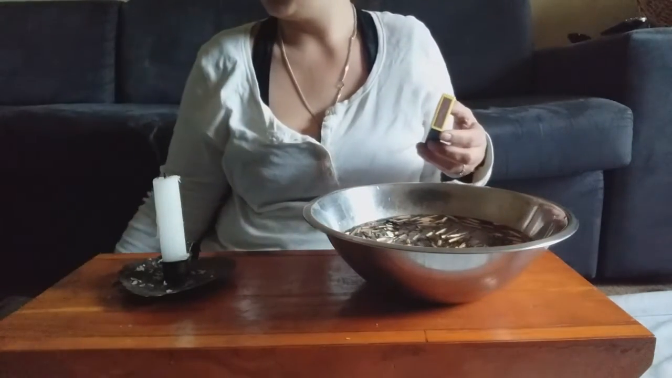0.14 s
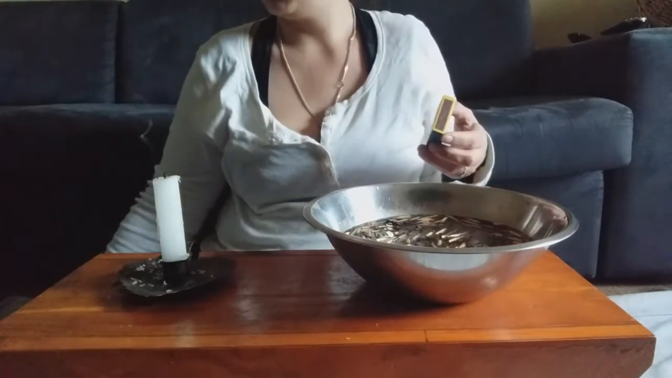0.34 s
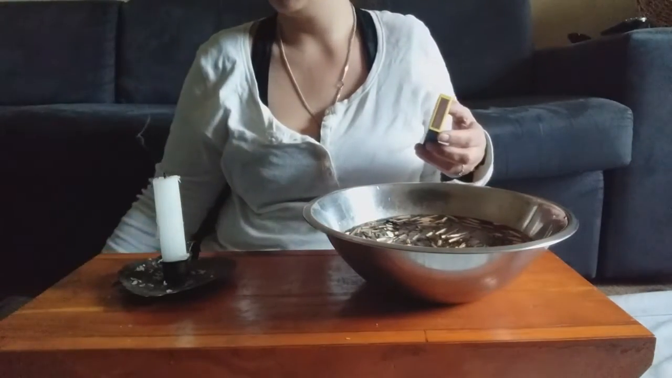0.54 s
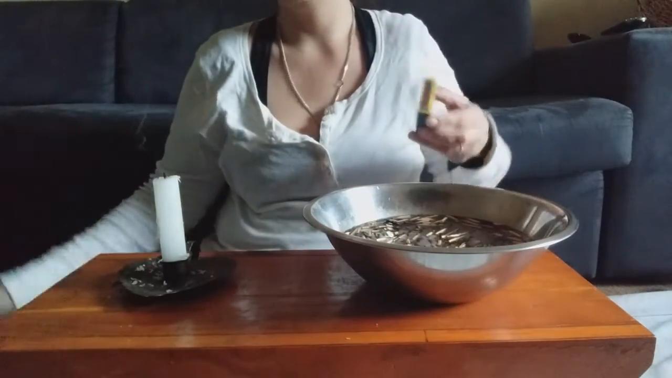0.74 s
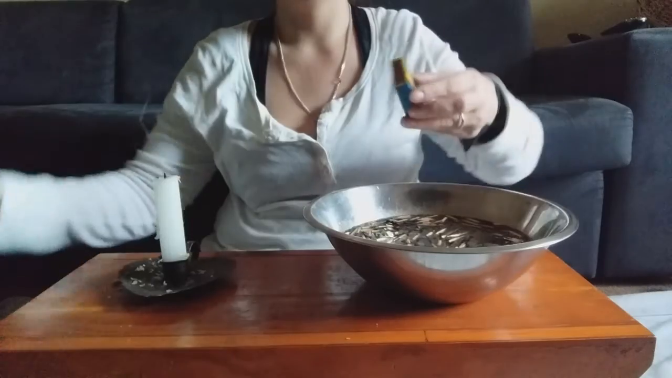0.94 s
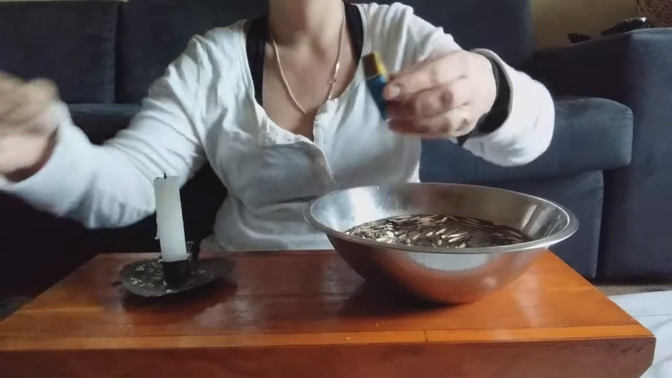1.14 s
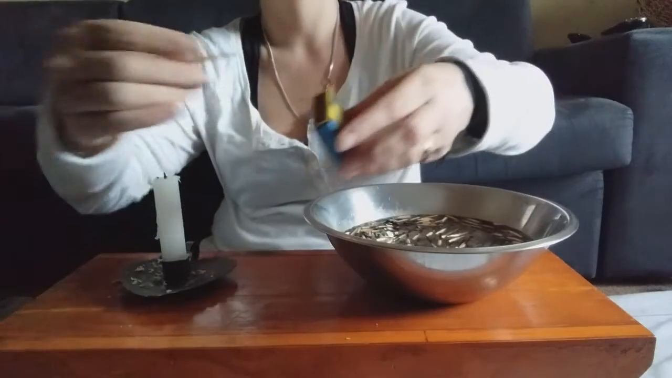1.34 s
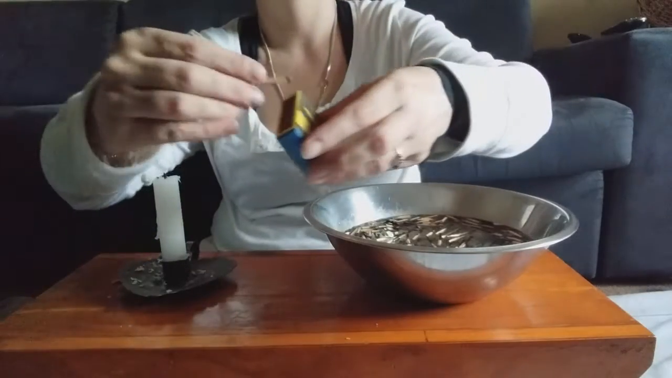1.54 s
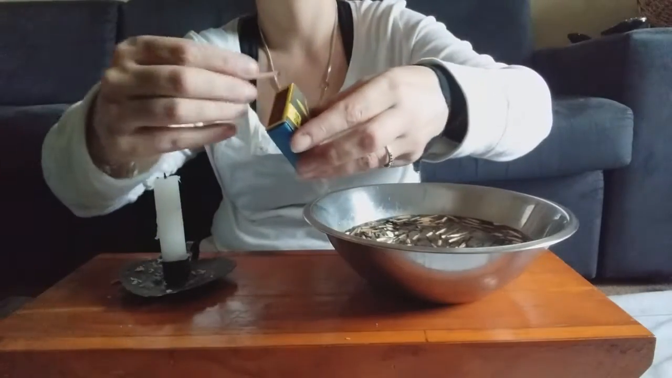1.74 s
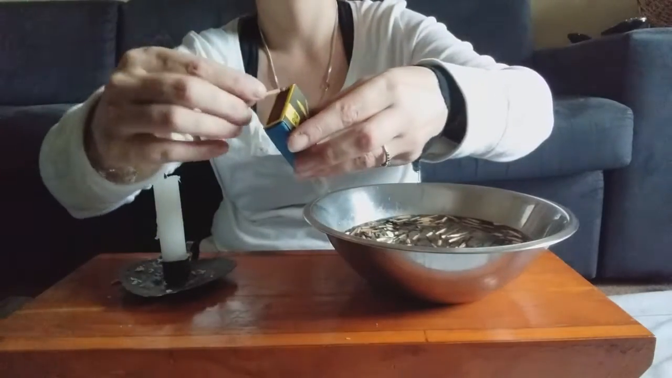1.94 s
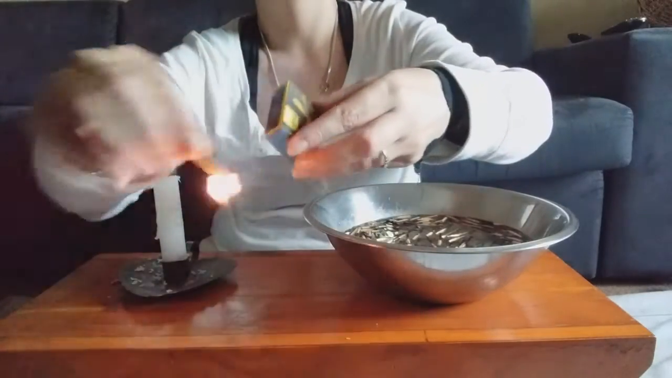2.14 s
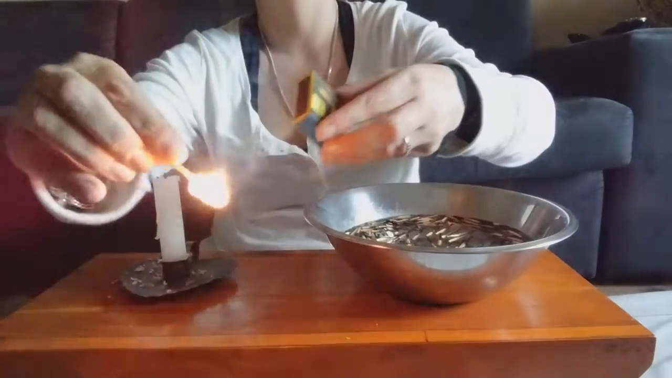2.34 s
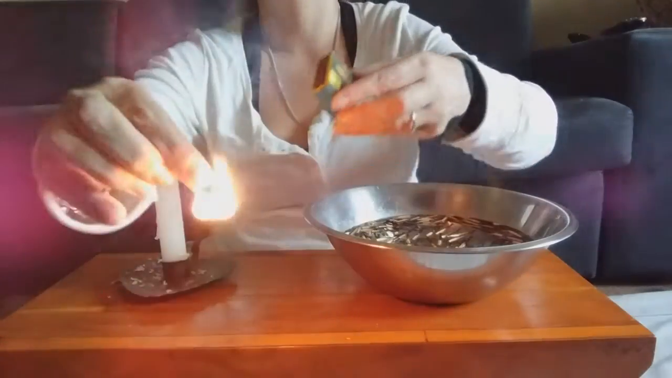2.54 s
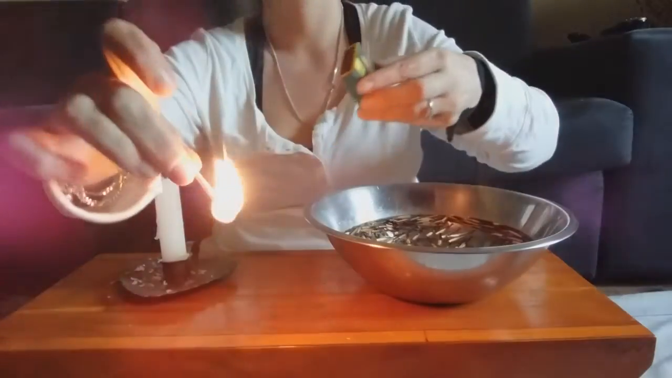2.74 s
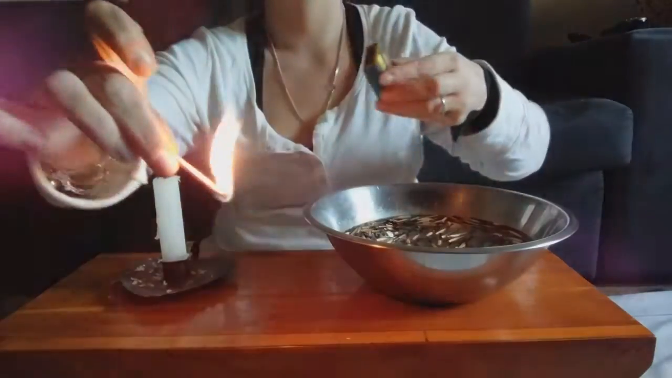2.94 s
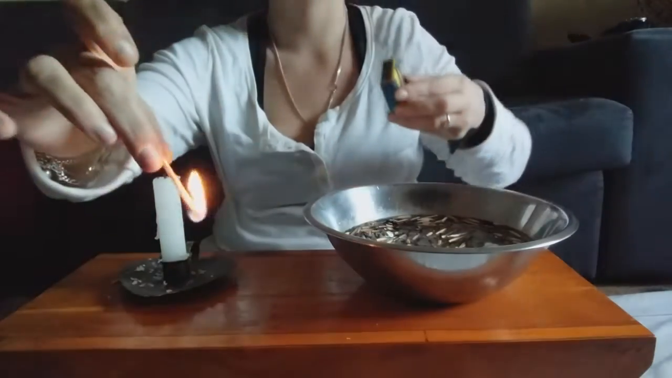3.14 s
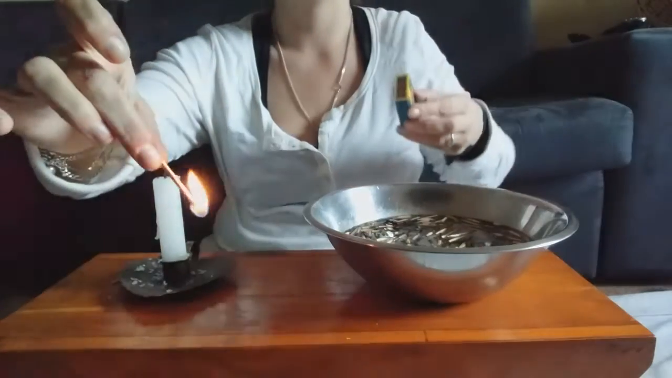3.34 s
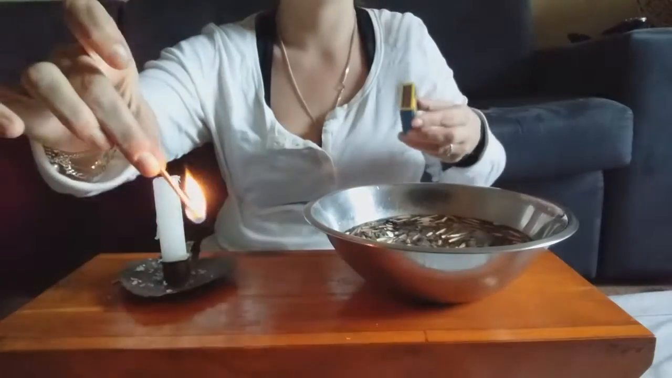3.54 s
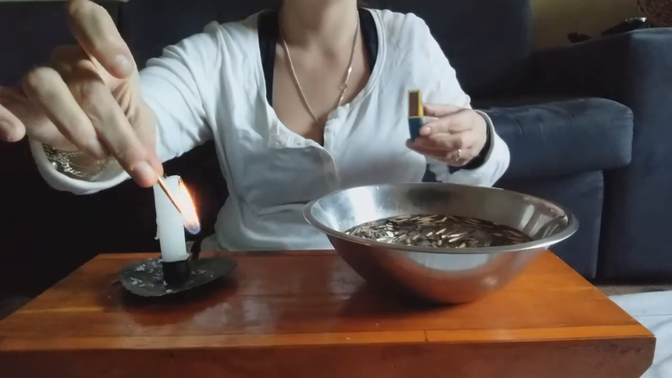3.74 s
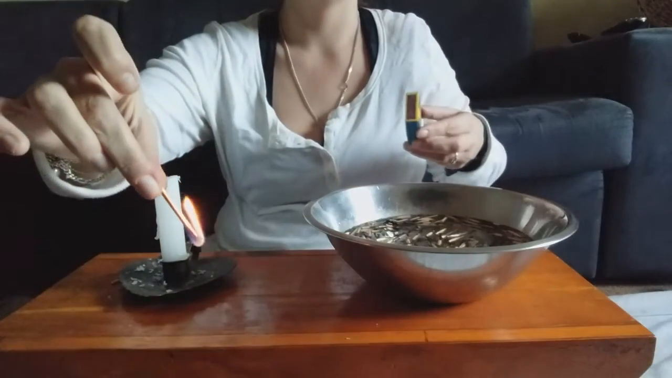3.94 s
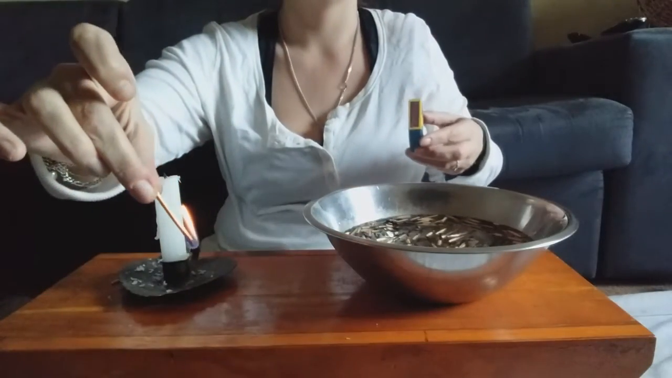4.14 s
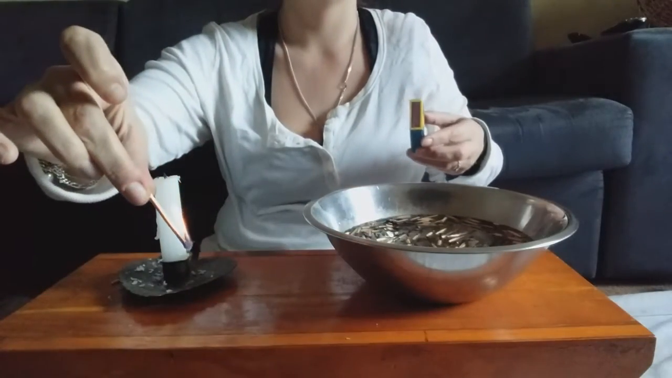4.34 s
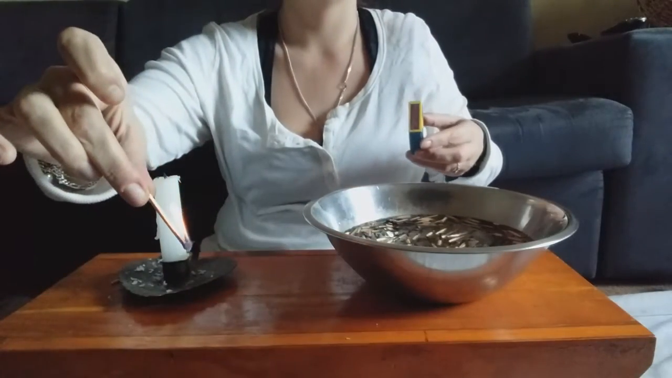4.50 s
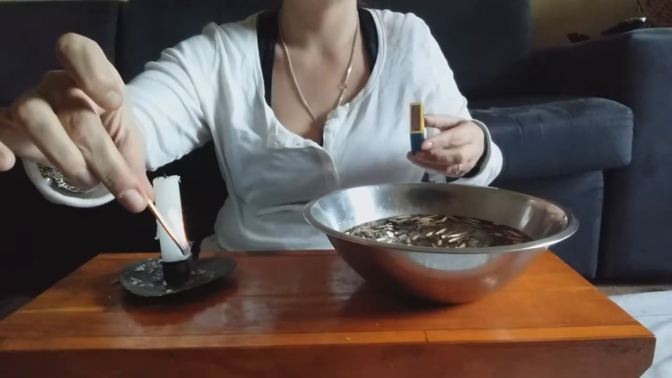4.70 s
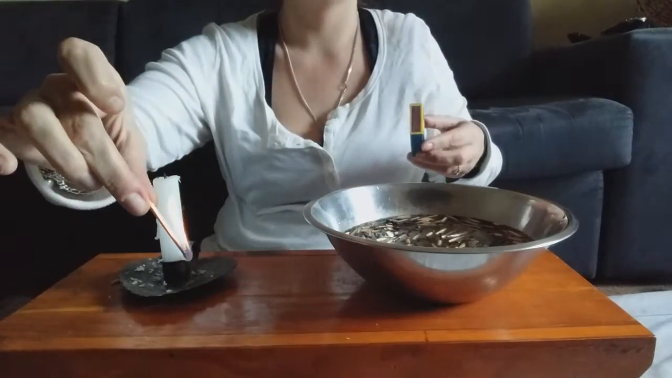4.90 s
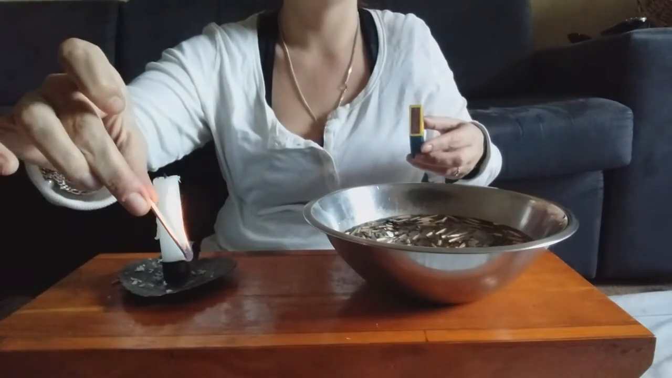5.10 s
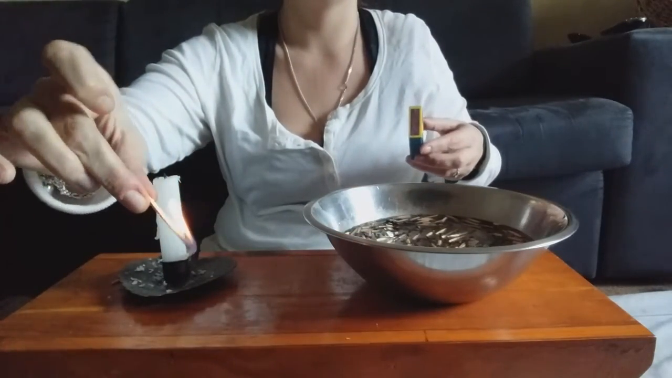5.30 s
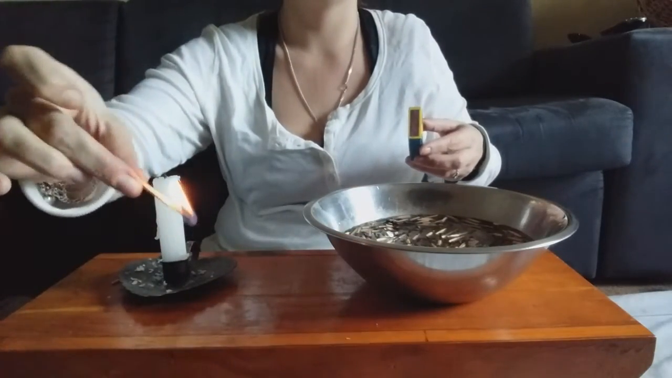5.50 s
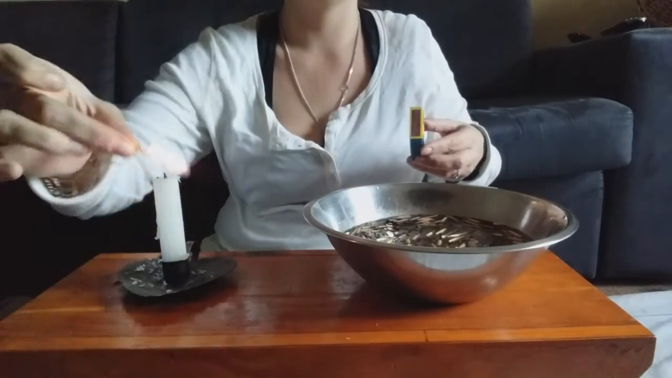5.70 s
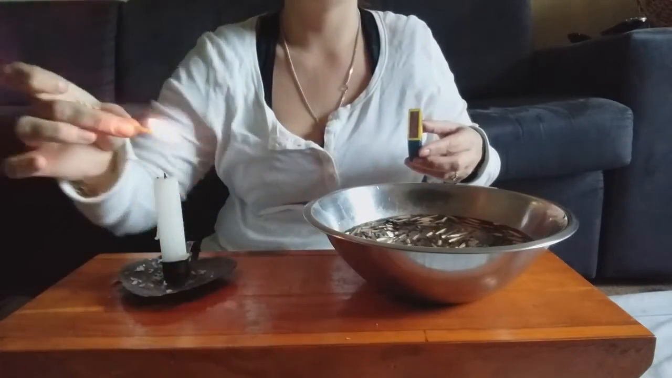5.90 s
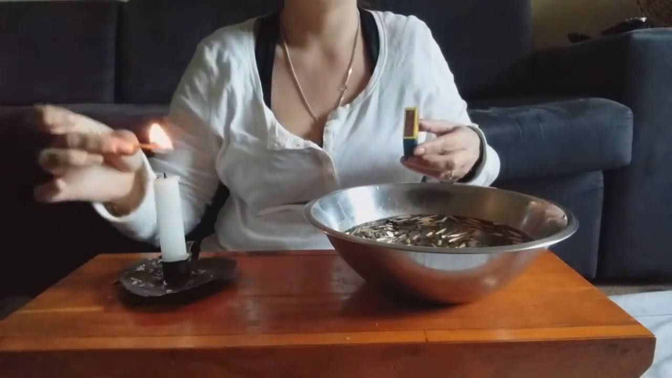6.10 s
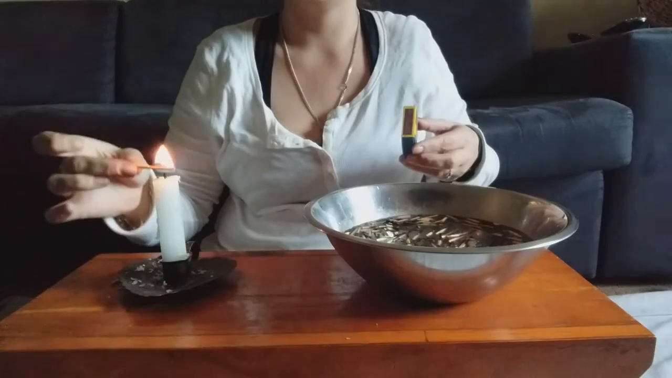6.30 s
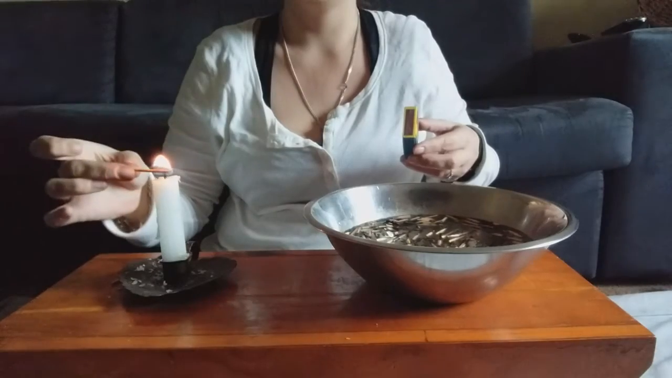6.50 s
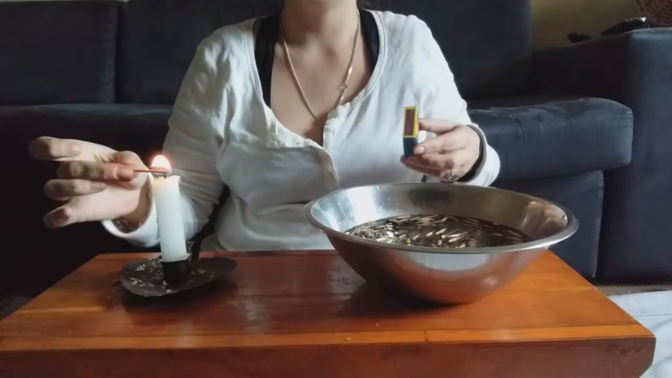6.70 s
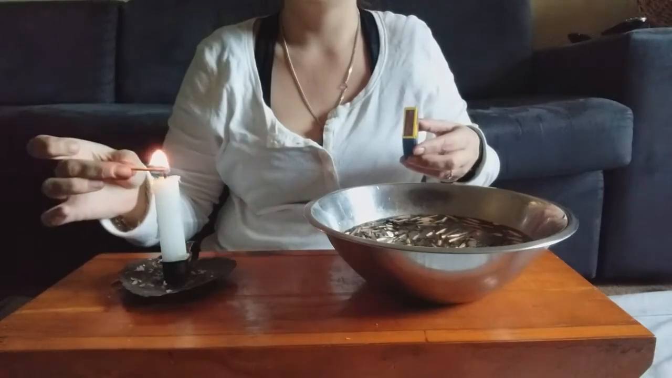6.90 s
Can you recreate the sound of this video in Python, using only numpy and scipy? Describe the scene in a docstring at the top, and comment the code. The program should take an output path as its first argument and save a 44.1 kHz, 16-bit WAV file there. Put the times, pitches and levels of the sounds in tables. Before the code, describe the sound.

A matchstick knocks lightly on its small box, then rasps briefly along the strip and ignites with a breathy, bright hiss. Scattered sharp pops follow as the hiss fades. After a quieter spell, the flame meets waxy wick material and crackles violently, with snapping bursts and short sputters, before dwindling to tiny ticks. The microphone is near, in a furnished room with short reflections, faint hiss, dim motor hum and soft rumble.

```python
"""A low rumble, a faint motor hum and microphone hiss (shaped noise and sines) run throughout.
First come faint high tinkles (narrow noise). From 1.7 s a match taps its cardboard box: short pushes make it ring.
At 2.2 s the match is dragged along the strip (bursts of rubbing noise) and flares with a hiss over a low roar.
From 2.5 s the flame spits sharp pops (short wave packets), thickest near 5 s, when it meets a waxy wick.
Puffs of gritty hiss join them from 3.5 s. A furnished room answers all but the steady background."""
import sys
import numpy as np
from scipy import signal
from scipy.fft import rfft, irfft, next_fast_len
from scipy.io import wavfile
from scipy.ndimage import uniform_filter1d

SR = 44100
rng = np.random.default_rng(int(sys.argv[2]) if len(sys.argv) > 2 else 0)


def generate_wav(sig):
    """Save sig (samples, or channels by samples) to the path in sys.argv[1] as 16-bit PCM at SR."""
    pcm = np.round(np.clip(np.atleast_2d(sig).T, -1, 1) * 32767).astype(np.int16)
    wavfile.write(sys.argv[1], SR, pcm)


N = 310974  # samples in the scene


def undb(db):
    """Turn decibels into a plain multiplier."""
    return 10 ** (np.asarray(db) / 20)


def unit(x):
    """Scale to rms 1."""
    return x / np.sqrt(np.mean(x ** 2))


def lowpass(x, hz):
    """Keep what lies below hz, with a gentle two-pole slope."""
    return signal.lfilter(*signal.butter(2, hz, fs=SR), x)


def highpass(x, hz):
    """Keep what lies above hz, with a gentle two-pole slope."""
    return signal.lfilter(*signal.butter(2, hz, "high", fs=SR), x)


def band(x, hz, width_hz):
    """Two-pole resonance, gain 1 at the centre."""
    centre_hz = min(hz, .45 * SR)
    return signal.lfilter(*signal.iirpeak(centre_hz, hz / width_hz, fs=SR), x)


def modes(x, table):
    """A body with several resonances of alternating sign."""
    out = 0
    for k, (hz, width_hz, db) in enumerate(table):
        out = out + (-1) ** k * undb(db) * band(x, hz, width_hz)
    return out


def colour(x, table):
    """Shape the spectrum of a steady noise by points of frequency and level; rms 1."""
    hz, db = np.transpose(table)
    size = next_fast_len(N)
    f = np.arange(size // 2 + 1) * SR / size + 1  # + 1 avoids log(0)
    gain = undb(np.interp(np.log(f), np.log(hz), db, -90, -90))
    return unit(irfft(rfft(x, size) * gain, size)[:N])


def curve(table):
    """Join the rows of a table by straight lines over time; very low outside."""
    s, *columns = np.transpose(table)
    t = np.arange(N) / SR
    return [np.interp(t, s, column, -120, -120) for column in columns]


def walk(rate):
    """Slow random sway: levels held for 1 / rate s, then smoothed twice; rms 1."""
    k = int(SR / rate)
    steps = np.repeat(rng.standard_normal(N // k + 1), k)
    smooth = uniform_filter1d(uniform_filter1d(steps, k), k)
    return unit(smooth[:N])


def grit(rate, spread_db):
    """Random clicks, rate per second on average, a few far larger than the rest; rms 1."""
    hit = rng.random(N) < rate / SR
    size = undb(spread_db * rng.exponential(size=N))
    return unit(hit * rng.standard_normal(N) * size)


def bursts(s, db, length, edge=2):
    """Envelope of bursts that rise quickly, then fade; a higher edge stops them more abruptly."""
    env = np.zeros(N)
    for start, gain, d in zip(s, undb(db), length):
        u = np.arange(int(4 * d * SR)) / (d * SR)  # time in burst lengths
        i = int(start * SR)
        env[i:i + len(u)] += gain * np.minimum(8 * u, 1) * np.exp(-u ** edge * 1.2)
    return env


# low rumble of the house: (t/s, level/dB)
RUMBLE_LEVEL = [(0.0, -64), (0.96, -64.5), (1.3, -67.5), (2, -66), (2.8, -65.5), (3.3, -66.5), (4.3, -69),
                (5.6, -70.5), (7.06, -69.5)]
# its spectrum: (f/Hz, relative level/dB)
RUMBLE_TONE = [(15, -60.5), (25, -30), (40, -5), (81, 0), (123, -3.5), (167, -17.5), (358, -27),
               (442, -27.5), (467, -27.5), (700, -35.5), (910, -66.5), (1540, -120)]


def rumble():
    """Low-pitched noise whose level sways."""
    sway_db = 1.7 * walk(9.9)
    return colour(rng.standard_normal(N), RUMBLE_TONE) * undb(curve(RUMBLE_LEVEL)[0] + sway_db)


HUM_HZ, HUM_WAVER_HZ = 48.45, .15  # base frequency and its rms waver
# overtones of the motor hum: (multiple of the base frequency, rms level/dB)
HUM_LINES = [(7, -94.5), (8, -94), (9, -91), (11, -99)]


def motor_hum():
    """A few sine overtones that waver together in pitch."""
    turns = np.cumsum(HUM_HZ + HUM_WAVER_HZ * walk(3)) / SR
    out = 0
    for multiple, db in HUM_LINES:
        phase = 2 * np.pi * (multiple * turns + rng.random())
        out = out + np.sqrt(2) * undb(db) * np.sin(phase)
    return out


HISS_DB = -79.5  # rms
# spectrum of the microphone hiss: (f/Hz, relative level/dB)
HISS_TONE = [(410, -32), (700, -4.5), (1060, -3), (1120, -5), (2770, -5), (8650, -8), (15200, -6),
             (16000, -8.5)]


def microphone_hiss():
    """Steady noise from the microphone itself."""
    return undb(HISS_DB) * colour(rng.standard_normal(N), HISS_TONE)


TINKLE_SWAYS_PER_S = 70
# faint high tinkles: (t/s, f/Hz, level/dB before the last filter, length/s)
TINKLES = [(.322, 9650, -79.5, 0.08), (0.33, 6580, -84, 0.068), (0.415, 6500, -78, 0.032),
           (0.424, 5400, -86, .02), (0.468, 5260, -86, .03), (0.587, 9800, -77.5, .015)]


def tinkles():
    """Narrow bands of noise, high up, rattle briefly."""
    out = 0
    for s, hz, db, length in TINKLES:
        noise = unit(band(rng.standard_normal(N), hz, 400))
        rattle = noise * undb(4 * walk(TINKLE_SWAYS_PER_S))
        out = out + band(rattle * bursts([s], [db], [length], 4.3), hz, 600)
    return out


# hot gas spits out in short puffs: (t/s, level/dB, length/s, low flutter level/dB over the hiss)
PUFFS = [(3.543, -83, 0.021, 5), (3.576, -76, 0.068, -10), (3.835, -77.5, 0.036, -8),
         (3.873, -78, 0.035, -18), (4.507, -58, 0.018, -10), (4.527, -61.5, 0.015, 4.5),
         (4.858, -53, 0.019, -37), (4.957, -62, 0.013, -11), (4.988, -47.5, 0.0096, -3),
         (5.004, -58.5, 0.023, 3.5), (5.032, -65, 0.051, -0.5), (5.04, -54, 0.0196, -19),
         (5.183, -59, 0.012, -7), (5.205, -40, 0.017, -10), (5.211, -56.5, 0.062, -14.5),
         (5.25, -68, 0.021, -9), (5.399, -67.5, 0.046, -8), (5.45, -77, 0.027, -4), (5.497, -73, 0.02, -4),
         (5.583, -71, 0.05, -20), (5.997, -77, .04, -13)]
# resonances of the flutter: (f/Hz, width/Hz, level/dB)
FLUTTER = [(190, 71, 3), (415, 250, 6), (1268, 540, 4)]
# spectrum of the hiss: (f/Hz, relative level/dB)
PUFF_TONE = [(1000, -3), (2000, -5.5), (3200, 2), (5500, 4), (8000, 0), (12000, -1), (16000, -4)]


def puffs():
    """Spurting gas makes a gritty hiss with a low flutter."""
    s, db, length, low_db = np.transpose(PUFFS)
    hiss = colour(grit(7000, 1.6), PUFF_TONE) * bursts(s, db, length)
    flutter = unit(modes(rng.standard_normal(N), FLUTTER)) * bursts(s, db + low_db, length)
    return hiss + flutter


CRACKLE_SPREAD_DB = 4  # most that a pop strays from the mean level
CRACKLE_TREBLE_DB, CRACKLE_TREBLE_SPREAD_DB = -3, 5  # snap over crack: mean, most it strays
# stretches of small random pops: (start t/s, length/s, pops per s, mean level/dB)
CRACKLE = [(2.926, .11, 94, -48), (4.846, .016, 200, -46), (4.916, 0.077, 97, -44), (5.003, .06, 83, -44),
           (5.105, .016, 180, -51), (5.185, .08, 67, -40)]


def crackle():
    """Rows of small pops, loosely spread over each crackling stretch."""
    rows = []
    for start, length, rate, db in CRACKLE:
        count = max(round(length * rate), 1)
        chance = rng.random((32, 3))[:count].T
        n = chance.shape[1]
        s = start + length * (np.arange(n) + chance[0]) / n
        size_db = db + CRACKLE_SPREAD_DB * (2 * chance[1] - 1)
        treble_db = CRACKLE_TREBLE_DB + CRACKLE_TREBLE_SPREAD_DB * (2 * chance[2] - 1)
        rows += zip(s, size_db, treble_db)
    return rows


def wavelet(hz, cycles, phase):
    """A short bell-shaped wave packet, one row per pop; cycles sets its half-width."""
    u = (np.arange(-100, 101) / SR) * np.reshape(hz, (-1, 1))
    return np.exp(-(u / cycles) ** 2) * np.cos(2 * np.pi * u + np.reshape(phase, (-1, 1)))


CRACK_HZ, CRACK_HZ_PER_DB, CRACK_CYCLES = 5350, 82, 0.49  # Hz rise per dB of treble
SNAP_HZ, SNAP_CYCLES = 12300, 0.71
THUMP_HZ, THUMP_CYCLES = 556, 0.36
THUMP_DB, THUMP_GROWTH = -65, 0.63  # thump of a -40 dB pop; dB gained per dB of pop
# the clear pops of the flame: (t/s, crack level/dB before the bass cut, snap level/dB over it)
POPS = [(2.451, -34, -12), (2.5219, -29, -1), (2.8864, -38.5, 3), (2.9121, -32, 2.5), (2.959, -36, 0),
        (3.0193, -44, 10), (3.2466, -53.5, -6), (3.5473, -49, 1), (3.5723, -48, -1), (3.8325, -50, -3.5),
        (3.8739, -52.5, 0), (4.3047, -54.5, 5.5), (4.4634, -59, -2), (4.5057, -31, -5.5),
        (4.5136, -34.5, -3), (4.515, -41, -6), (4.5295, -26, -2.5), (4.5872, -47, -18), (4.597, -45, -2),
        (4.6307, -51, -17), (4.6487, -50.5, -14), (4.692, -40.5, -5.5), (4.716, -47.5, 1),
        (4.7425, -52.5, -1), (4.7776, -43.5, -2.5), (4.8645, -27.5, -1), (4.8699, -29, 3.5),
        (4.9074, -48, -13), (4.9407, -37.5, 2), (4.9537, -39, 1), (4.963, -36, 0), (4.9716, -25.5, -2),
        (4.9902, -12.5, -4), (5.0088, -35, 2), (5.0145, -31, -2), (5.0171, -32.5, 5.5), (5.0463, -29, -6),
        (5.048, -32, 1), (5.0623, -24.5, 5), (5.1126, -27, 5), (5.1274, -38.5, 3), (5.1824, -27, -0.5),
        (5.187, -30, 1), (5.2032, -20.5, -5.5), (5.2089, -22.5, -1), (5.2095, -24.5, 5),
        (5.2129, -14.5, -3), (5.2152, -13, -1), (5.2231, -32, -13), (5.2427, -27.5, -1),
        (5.273, -35.5, 0.5), (5.3203, -50, 2), (5.3964, -35, 2.5), (5.4003, -43, -2), (5.4238, -48, 2),
        (5.4544, -38.5, -1), (5.4983, -42.5, -1), (5.506, -51, -3), (5.5829, -37.5, 2.5), (5.591, -54, 8),
        (5.726, -60.5, 6), (5.8719, -61, -4), (5.8785, -57, -4), (5.891, -63.5, 8), (5.9972, -52.5, -9),
        (6.014, -58, -11), (6.232, -59.5, -23)]


def pops():
    """Each burst pocket of gas gives a short crack, a brighter snap and a late thump."""
    s, db, treble_db = np.transpose(POPS + crackle())
    chance = rng.standard_normal((len(s), 5)).T
    at = (s * SR).astype(int)[:, None] + np.arange(-100, 101)
    # pops with more treble also crack higher
    hz = CRACK_HZ + CRACK_HZ_PER_DB * np.clip(treble_db, -25, 10)
    hz = hz * (1 + .12 * np.tanh(chance[4]))
    crack = wavelet(hz, CRACK_CYCLES, 3.3 + .5 * chance[0])
    snap = wavelet(SNAP_HZ * (1 + chance[1] / 14), SNAP_CYCLES, np.pi * chance[2])
    thump_hz = THUMP_HZ * (1 + np.tanh(chance[3]) / 6)
    thump = wavelet(thump_hz, THUMP_CYCLES, np.full(len(s), np.pi / 2))
    out = np.zeros(N)
    np.add.at(out, at, undb(db)[:, None] * (crack + undb(treble_db)[:, None] * snap))
    # a tiny source radiates no bass of its own
    out = highpass(out, 1100)
    thump_db = THUMP_DB + THUMP_GROWTH * (db + 40)
    np.add.at(out, at + 30, undb(thump_db)[:, None] * thump)  # 30 samples late
    return out


# resonances of the hollow cardboard box: (f/Hz, width/Hz, level/dB)
BOX_MODES = [(1495, 170, -2.5), (2055, 190, -1), (2533, 330, -9.5), (3030, 220, -6.5), (4230, 260, -3.5),
             (5350, 400, -15.5), (7100, 230, -8), (8550, 590, -13.5)]


def box(push):
    """The walls of the box ring; being small, it radiates little bass."""
    return highpass(modes(push, BOX_MODES), 1200)


TICK_DB = -24  # bare contact click, relative to the blow
# the match knocks and rattles on the box: (t/s, blow level/dB, nominal contact time/s)
TAPS = [(1.671, -23, 0.00014), (1.6767, -18, 0.00013), (1.6785, -21.5, 0.00013), (1.684, -24, 0.00013),
        (1.9195, -11, 0.00004), (1.931, -13, .0002)]
# fingers and match scuff the box: (t/s, level/dB before filtering, length/s)
SCUFFS = [(1.682, -56, 0.053), (1.752, -64, 0.036), (1.932, -51, 0.056)]


def taps():
    """Short rounded pushes, where a longer contact gives a duller knock, and a soft scuffing."""
    push = np.zeros(N)
    for s, db, contact in TAPS:
        shape = np.hanning(int(2 * contact * SR) + 3)
        i = int(s * SR)
        push[i:i + len(shape)] += undb(db) * shape / shape.sum()
    scuff = lowpass(grit(3000, 2.0), 4500) * bursts(*np.transpose(SCUFFS))
    tick = highpass(push, 7000)
    return box(push + scuff) + undb(TICK_DB) * tick


BOX_AIR_HZ, BOX_AIR_WIDTH_HZ = 408, 330


def box_air(push):
    """The air in the box rings in one low, clean band."""
    once = band(push, BOX_AIR_HZ, BOX_AIR_WIDTH_HZ)
    return band(once, BOX_AIR_HZ, BOX_AIR_WIDTH_HZ)


SHOVE_HZ, SHOVE_WIDTH_HZ, SHOVE_DB = 190, 120, 0  # hand and box jolt
# the head catches and slips on the strip: (t/s, rub level/dB, length/s, rasp level/dB over it)
SLIPS = [(2.166, -53.5, 0.0041, -2), (2.1726, -44, 0.0083, -2.5), (2.1774, -30.5, 0.0022, 1),
         (2.1792, -25, 0.0018, 2.5), (2.1811, -33, 0.0062, 0), (2.1889, -29, 0.0048, 3),
         (2.1938, -32.5, 0.0015, 0.5), (2.1968, -25.5, 0.0018, 6.5), (2.1977, -29.5, 0.027, -8),
         (2.2221, -22, 0.0013, 4), (2.223, -32.5, 0.0051, 1.5), (2.229, -43, 0.013, -3)]
# spectrum of the strip's rasp: (f/Hz, relative level/dB)
RASP_TONE = [(700, -24), (1300, -3), (2500, -7), (3500, -6), (4700, 0), (6500, -6.5), (8200, 0), (9200, -9),
             (11000, -4.5), (14000, -7.5), (16000, -3.5)]


def strike():
    """Dense, even grit shakes the box and the air in it; the strip itself rasps broadly."""
    s, db, length, treble_db = np.transpose(SLIPS)
    rub = unit(rng.random(N) - .5)
    # the fingers that hold the box damp its upper modes
    push = lowpass(rub * bursts(s, db, length, 6.3), 2800)
    walls = undb(8) * box(push)
    air = undb(5.0) * box_air(push)
    rasp = colour(rub, RASP_TONE) * bursts(s, db + treble_db, length, 3)
    shove = undb(SHOVE_DB) * band(push, SHOVE_HZ, SHOVE_WIDTH_HZ)
    return walls + air + rasp + shove


JET_SWAY_DB, ROAR_SWAY_DB = 0.83, 2  # rms; the jet's slowest sway only
# treble gain above TREBLE_HZ: least at TREBLE_LOW_S, rising on either side of it
TREBLE_HZ, TREBLE_LOW_DB, TREBLE_DB_PER_S, TREBLE_LOW_S = 9040, -7, 8, 2.44
# burning head: (t/s, gas jet level/dB, flame roar level/dB over the jet)
FLARE = [(2.234, -46, -6), (2.282, -52.5, -8), (2.39, -55.5, -7), (2.52, -52.5, -7.5), (2.63, -53.5, -8.5),
         (2.7, -52, -3.5), (2.75, -54, -10), (2.8, -52.5, -5.5), (3.012, -59.5, -12), (3.062, -78, -20),
         (3.1, -84, -10)]
# spectrum of the jet: (f/Hz, relative level/dB)
JET_TONE = [(700, -31.5), (900, -11), (1170, -3), (1700, -12), (1960, -1.5), (2300, -9), (3000, -3),
            (3700, -6.5), (4400, -0.5), (6000, -3.5), (7000, -11), (8300, -4.5), (9500, -12), (11500, -8.5),
            (16000, -13.5)]
# resonances of the roar: (f/Hz, width/Hz, level/dB)
ROAR = [(457, 210, -0.5), (162, 28, -4.5), (870, 330, -9.5)]


def flare():
    """Gas jets out of the burning head in uneven spurts over a low roar."""
    jet_db, roar_db = curve(FLARE)
    spurts_db = JET_SWAY_DB * walk(14) + 1.2 * walk(40) + 1.5 * walk(250)
    noise = rng.standard_normal(N) + 0.4 * grit(1200, 1.5)
    jet = colour(noise, JET_TONE) * undb(jet_db + spurts_db)
    top = highpass(jet, TREBLE_HZ)
    low = lowpass(jet, TREBLE_HZ)
    treble_db = TREBLE_LOW_DB + TREBLE_DB_PER_S * np.abs(np.arange(N) / SR - TREBLE_LOW_S)
    # minus, because the two filters have opposite phase where they meet
    jet = low - top * undb(np.minimum(treble_db, 6))
    roar = unit(modes(rng.standard_normal(N), ROAR))
    return jet + roar * undb(jet_db + roar_db + ROAR_SWAY_DB * walk(30))


# room answer by band, levels before the shared gain and near_share:
# (f/Hz, near surfaces level/dB, their 60 dB fade/s, walls level/dB, their 60 dB fade/s)
ROOM = [(502.6, -16, .03, -10.5, .25), (1430, -15.5, 0.093, -11, 0.14), (3170, -11, 0.015, -12.5, 0.25),
        (5194, -11, .02, -17.5, 0.37), (9200, -8.5, 0.0072, -18, 0.29), (14060, -10, 0.017, -17.5, 0.11)]


def room(x, near_share):
    """Quick scatter from table and bowl, then a longer answer from the walls."""
    t = np.arange(int(.4 * SR)) / SR
    answer = 0
    for hz, near_db, near_t60, wall_db, wall_t60 in ROOM:
        near = undb(-60 * t / near_t60) * (t > .0005)
        wall = undb(-60 * t / wall_t60) * np.clip((t - .003) / 0.0017, 0, 1)
        near = near_share * undb(near_db) * near / np.linalg.norm(near)
        wall = undb(wall_db) * wall / np.linalg.norm(wall)
        noise = band(band(rng.standard_normal(len(t)), hz, .8 * hz), hz, .8 * hz)
        answer = answer + (near + wall) * noise
    return x + 1.5 * signal.oaconvolve(x, answer)[:N]


def scene():
    """Add the sources, each in the room, to the steady background."""
    background = rumble() + motor_hum() + microphone_hiss()
    low_down = room(tinkles() + puffs() + pops(), 0.58)
    knocks = room(taps(), 1.0)
    # the strike and the flare happen higher, away from the table top
    high_up = room(strike() + flare(), 0.13)
    return (background + low_down + knocks + high_up)[None]


BOTTOM_HZ, TOP_HZ = 46, 15760


def record(dry):
    """The microphone loses the deepest bass and the phone cuts the top."""
    bass_cut = signal.butter(6, BOTTOM_HZ, "high", fs=SR, output="sos")
    top_cut = signal.firwin(801, TOP_HZ, window=("kaiser", 8), fs=SR)
    return signal.oaconvolve(signal.sosfilt(bass_cut, dry), top_cut[None], "same")


dry = scene()
out = record(dry)
generate_wav(out)
```